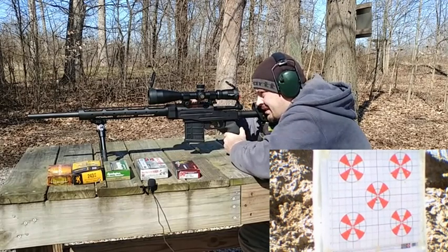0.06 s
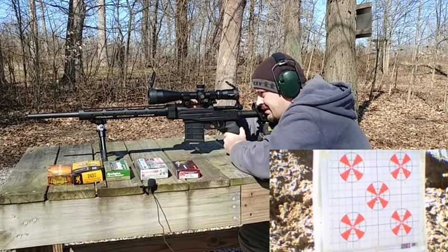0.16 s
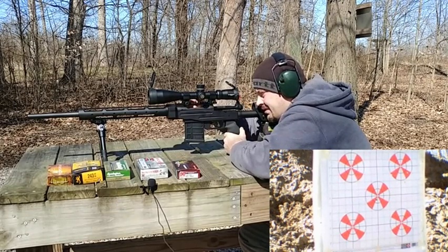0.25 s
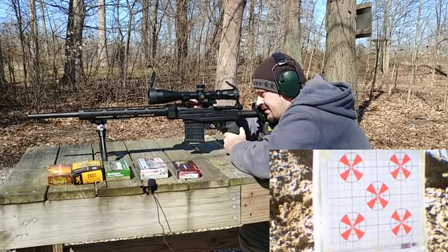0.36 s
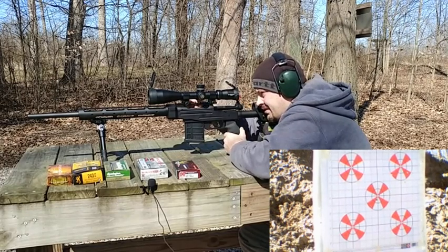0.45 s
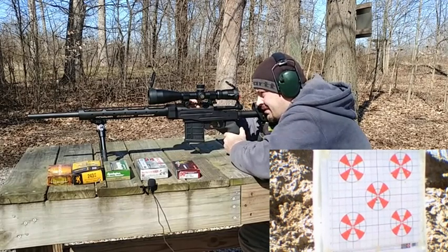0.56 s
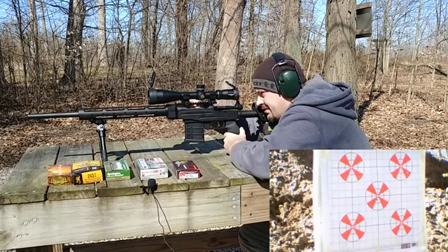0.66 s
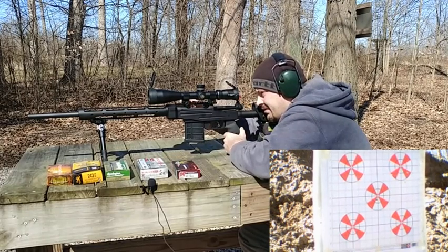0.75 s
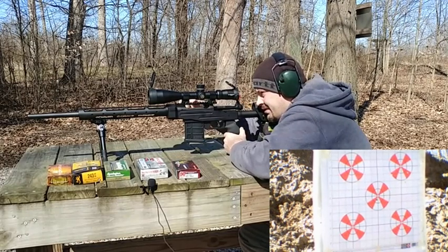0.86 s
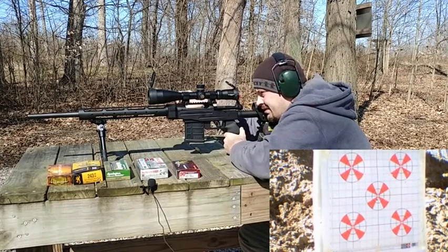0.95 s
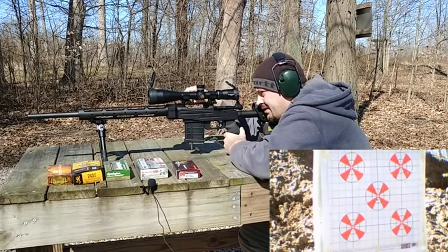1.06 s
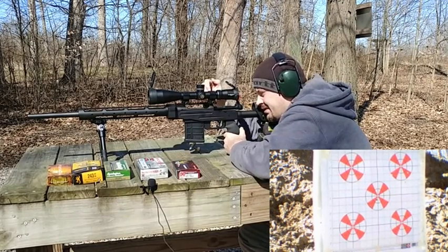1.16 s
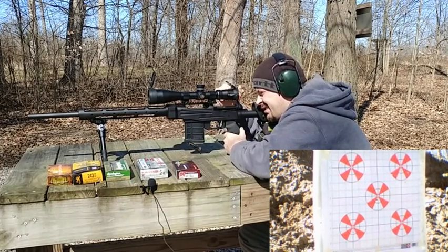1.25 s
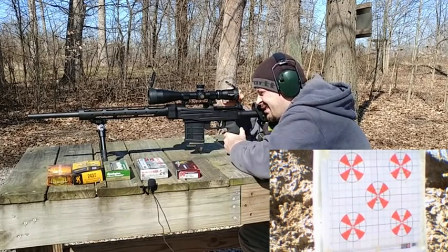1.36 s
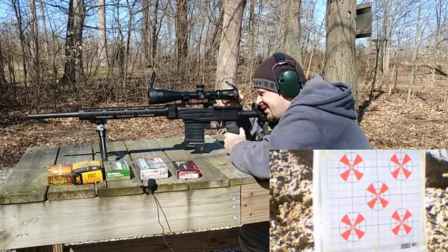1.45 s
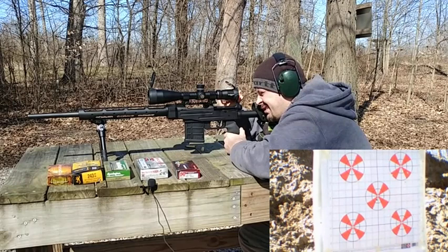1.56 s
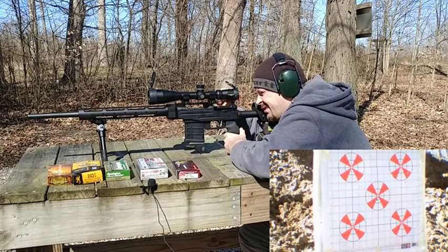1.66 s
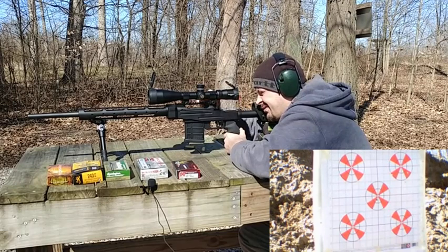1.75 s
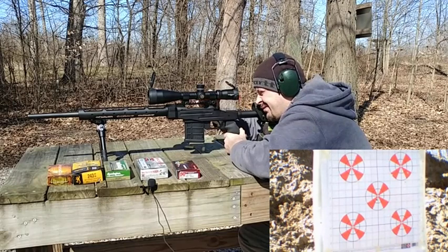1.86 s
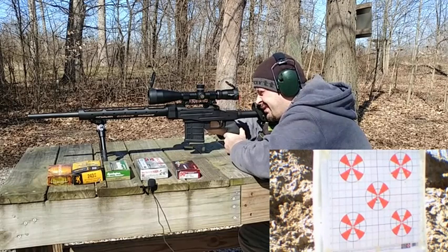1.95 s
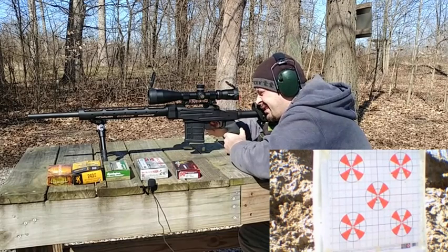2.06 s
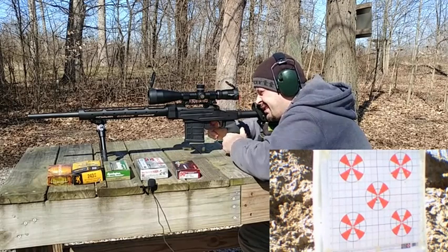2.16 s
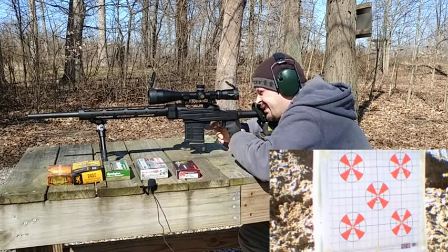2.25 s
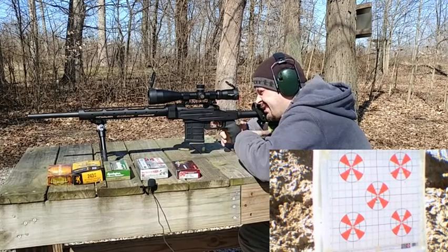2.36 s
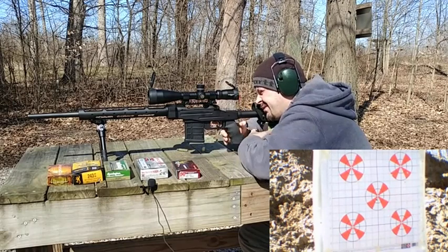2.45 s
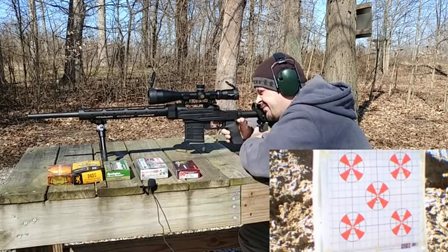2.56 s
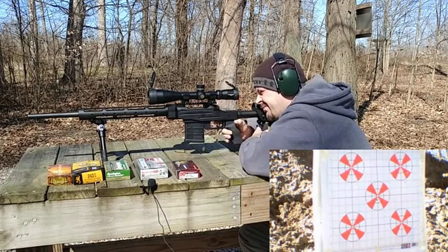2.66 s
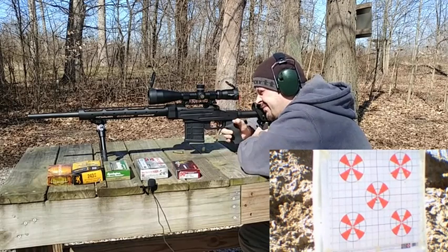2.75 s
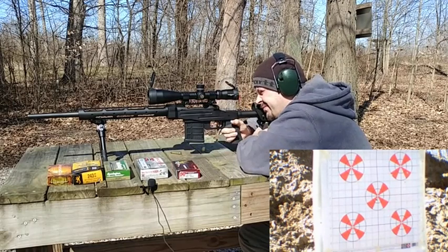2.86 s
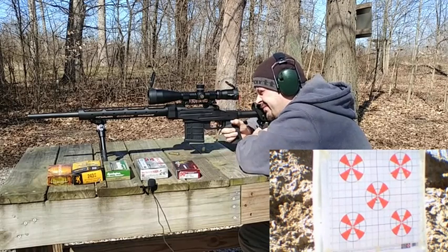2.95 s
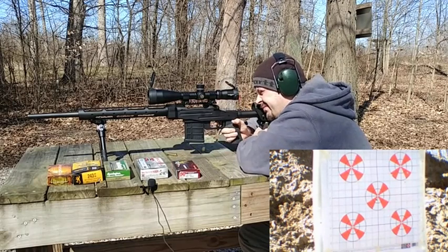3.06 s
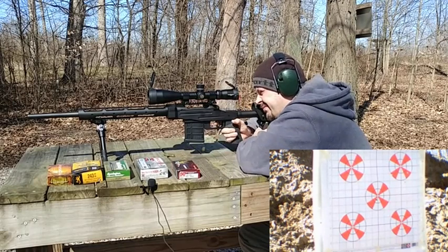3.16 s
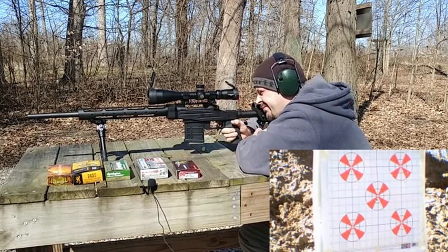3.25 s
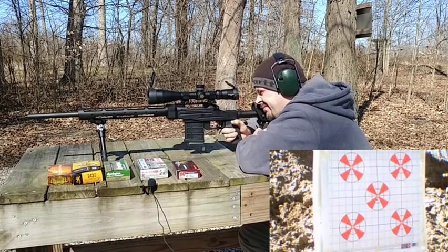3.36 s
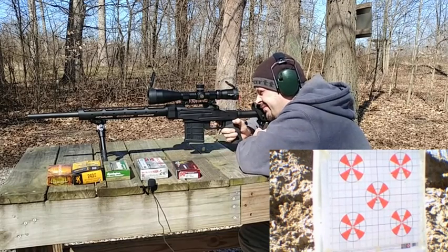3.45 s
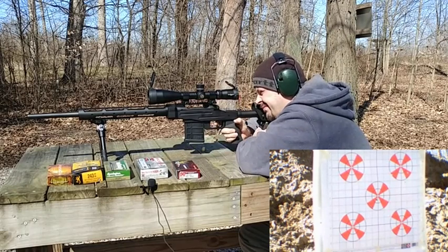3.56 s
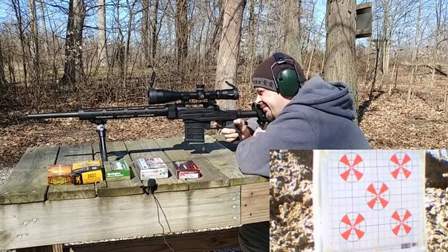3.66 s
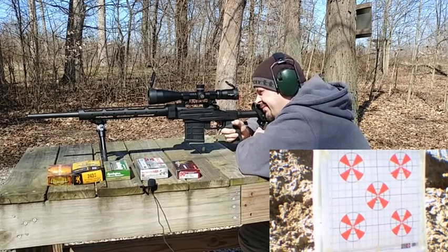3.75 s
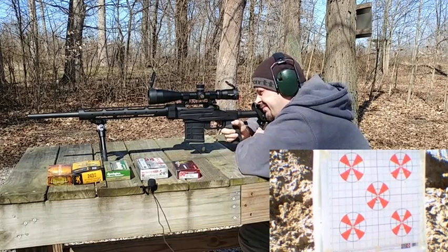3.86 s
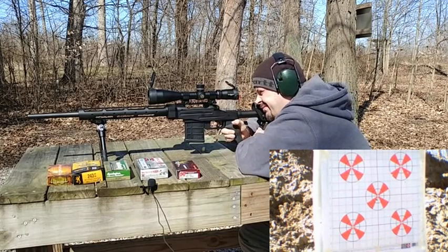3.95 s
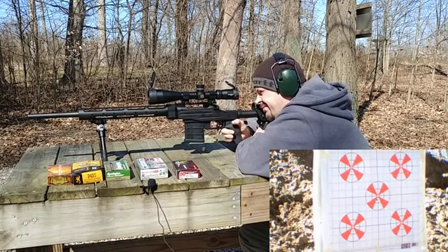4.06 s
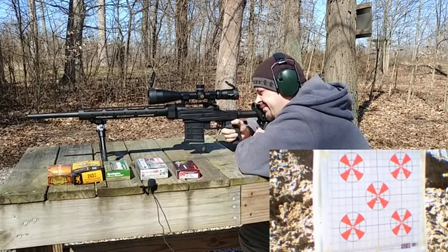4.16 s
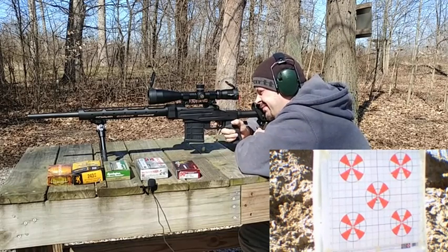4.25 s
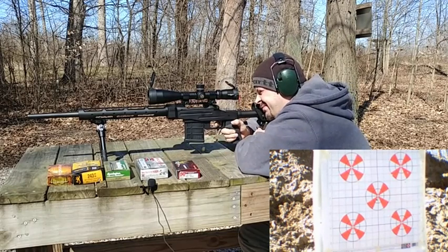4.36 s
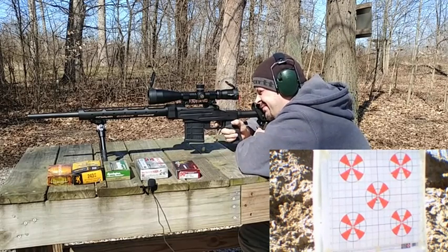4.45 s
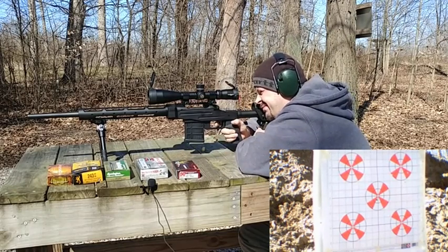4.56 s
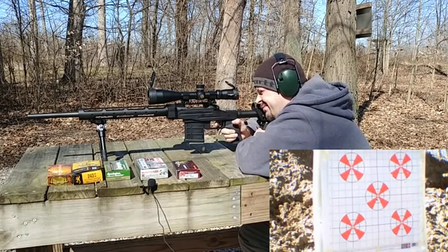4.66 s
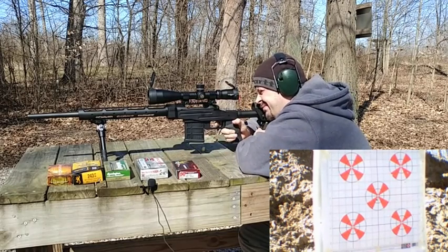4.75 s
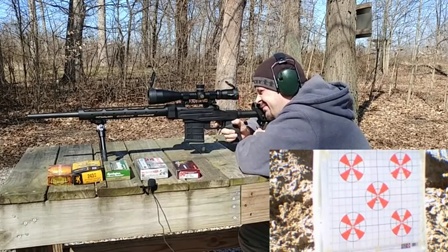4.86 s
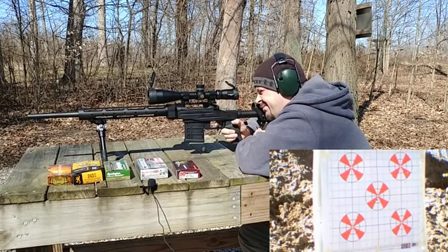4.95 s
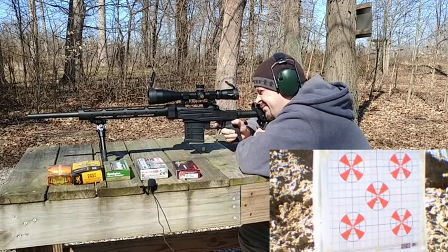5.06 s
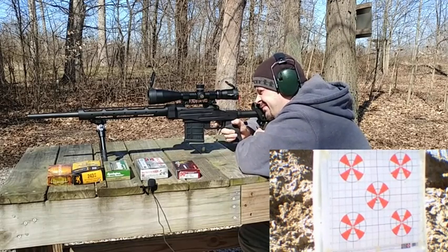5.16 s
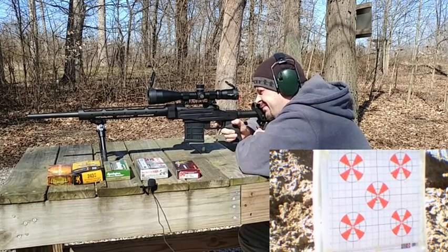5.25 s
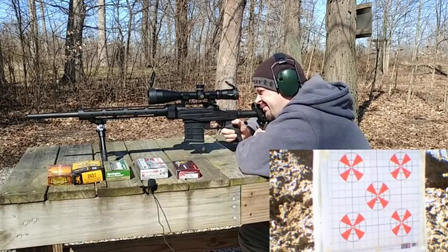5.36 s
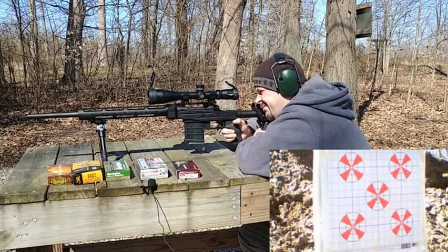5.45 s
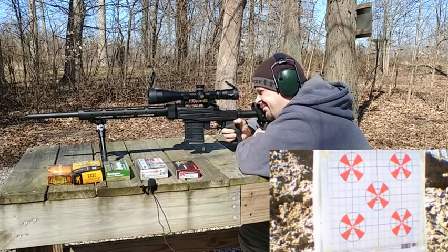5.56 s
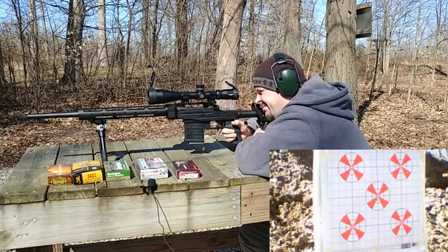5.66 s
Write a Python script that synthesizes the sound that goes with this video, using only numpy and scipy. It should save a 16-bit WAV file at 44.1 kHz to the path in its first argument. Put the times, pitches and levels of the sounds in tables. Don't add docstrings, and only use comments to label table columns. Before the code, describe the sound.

Close at a wooden bench in bare woods: small handle clicks, a crisp metal catch, then a hard brass-on-wood knock with rapid lighter bounces. A rough metal push ends in heavy clacks and a bright locking snap. The rest is quiet, with dull knocks and little ticks from shifting arms over a distant low engine rumble, a thin bird trill and steady microphone hiss. Echoes are faint and short.

```python
import sys
import numpy as np
from scipy import signal
from scipy.fft import rfft, irfft, next_fast_len
from scipy.io import wavfile
from scipy.ndimage import uniform_filter1d, map_coordinates

SR = 44100
rng = np.random.default_rng(int(sys.argv[2]) if len(sys.argv) > 2 else 0)


def bounce(signal):
    frames = np.transpose(np.atleast_2d(signal))
    limited = np.clip(frames, -1, 1)
    pcm = np.round(limited * 32767).astype(np.int16)
    wavfile.write(sys.argv[1], SR, pcm)


def ratio_of_db(decibels):
    return 10 ** (np.asarray(decibels, float) / 20)


N = 251722


def in_time(rows):
    s, *columns = np.transpose(rows)
    return [np.interp(np.arange(N) / SR, s, column) for column in columns]


def at_hz(points, hz):
    table_hz, values = np.array(points)[:, 0], np.array(points)[:, 1]
    return np.interp(np.log(hz + 1), np.log(table_hz), values)


def rms_one(x):
    return x / np.sqrt(np.mean(x ** 2) + 1e-20)


def coloured(x, points):
    size = next_fast_len(x.shape[-1], True)
    level_db = at_hz(points, np.fft.rfftfreq(size, 1 / SR))
    cepstrum = irfft(np.log(ratio_of_db(level_db)), size)
    cepstrum[1:size // 2] *= 2
    cepstrum[size // 2 + 1:] = 0
    return irfft(rfft(x, size) * np.exp(rfft(cepstrum)), size)[..., :x.shape[-1]]


def drift(rate_hz):
    steps = rng.standard_normal(600)
    return np.interp(np.arange(N) / SR * rate_hz, np.arange(600), steps)


def convolve(a, b):
    return signal.fftconvolve(a, b, axes=-1)[..., :a.shape[-1]]


# pitch_hz, level_db
APART = [(200, -12.5), (1000, -10), (3000, -9), (6000, 0.5)]


def spread(noise, points, apart=APART):
    mid, side = coloured(noise, points)
    return rms_one(mid + coloured(side, apart) * [[1], [-1]])


def plateau(s, held, level_db, rise_db_s, fall_db_s):
    t = np.arange(N) / SR
    return level_db - rise_db_s * np.maximum(s - t, 0) - fall_db_s * np.maximum(t - s - held, 0)


def evened(x):
    spectrum = rfft(x)
    power = uniform_filter1d(np.abs(spectrum) ** 2, size=48, axis=-1)
    return irfft(spectrum / np.sqrt(power), x.shape[-1])


def flutter(x, depth_db):
    waver = np.interp(np.arange(len(x)) / 256, np.arange(80), rng.standard_normal(80))
    return x * ratio_of_db(depth_db * waver)


def rings(modes, spread_db, stretch, size, split=0.):
    hz, level_db, t60 = np.transpose(modes)[:, :, None]
    hz = hz * (1 + split * rng.standard_normal(hz.shape))
    t = np.arange(size) / SR
    strength = ratio_of_db(level_db + spread_db * rng.standard_normal(hz.shape)) * rng.choice([-1, 1], hz.shape)
    decay = ratio_of_db(-60 * t / (t60 * stretch))
    return (strength * decay * np.sin(2 * np.pi * hz * t)).sum(axis=0)


def add(out, s, sound, pan_db):
    i = max(round(s * SR), 0)
    out[:, i:i + sound.shape[-1]] += sound[..., :N - i] * ratio_of_db([[pan_db / 2], [-pan_db / 2]])


BLOW_LEAD_S = .0065
STRIKE, RING_STRIKE = 3.9, 3.0


def blow(modes, crack, colour, contact_ms, ring_db, rattle_db, rattle_t60, stretch, size=6144):
    t = np.arange(size) / SR
    fade = np.hanning(2 * size)[size:]
    span = max(contact_ms, .2) / 1000
    force = np.minimum(t / 0.0013, 1) * np.exp(-(t / span) ** 2.0)
    uneven = ratio_of_db(2.5 * np.interp(t * 1500, np.arange(400), rng.standard_normal(400)))
    rattle = ratio_of_db(rattle_db - 60 * t / rattle_t60) * np.minimum(t / span, 1) * fade

    lead = np.zeros((2, 256))
    chatter = rng.standard_normal((2, size)) * uneven * (force + rattle)
    chatter[0, 16] += STRIKE
    dense = spread(evened(np.hstack([lead, chatter])), crack)

    drive = evened(force * rng.standard_normal(size))[:size // 8]
    drive[16] += RING_STRIKE
    ring = convolve(rings(modes, 2.0, stretch, size, split=.008), drive)
    ring = np.append(lead[0], ring * fade)

    dense, ring = coloured(dense, colour), coloured(ring, colour)
    sound = dense / np.abs(dense).max() + ratio_of_db(ring_db) * ring / np.abs(ring).max()
    sound[:, :256] = 0
    sound[:, -1024:] *= np.hanning(2048)[1024:] ** 2
    return sound / np.abs(sound.mean(axis=0)).max()


# time_s, fast_engine_db, slow_engine_db
DRONE = [(0, -5.5, -21.5), (1, -1.5, -8), (2, 0.5, -4.5), (2.7, -3.5, -13), (3, -12, -5), (3.6, -8.5, -3.5),
         (4.3, -7, -5), (4.9, -17.5, -3), (5.2, -3, -6), (5.71, -1, 0)]
FAST_HZ, SLOW_HZ = 29.71, 29
# multiple_of_rate, level_db
FAST_ORDERS = [(2, -65.5), (3, -62.5), (4, -72), (5, -79.5), (6, -60), (7, -75), (10, -71.5), (12, -87.5),
               (17, -81.5)]
# multiple_of_rate, level_db
SLOW_ORDERS = [(2, -54), (3, -64.5), (4, -64), (5, -62), (6, -71.5), (8, -81), (10, -73.5), (13, -77.5),
               (15, -81), (22, -80.5)]
# pitch_hz, level_db
RUMBLE = [(15, -39), (25, -15), (55, -2), (87, 2.5), (174, -7.5), (231, -12), (421, -21), (642, -20.5),
          (1820, -35.5), (3000, -36.5), (3900, -68.5), (6600, -120)]
# pitch_hz, level_db
FAR_APART = [(130, -14.5), (300, -4.5), (700, -2.5), (1500, 1)]
RUMBLE_DB, RUMBLE_RISE_DB, RUMBLE_RISE_S = -58.5, 2, 1.3
# start_s, length_s, pitch_hz, level_db
WHINE = [
    (2.68, 1, 645.5, -75),
    (2.95, .7, 790.3, -79),
]


def engine():
    fast_db, slow_db = in_time(DRONE)
    rumble_db = RUMBLE_DB - RUMBLE_RISE_DB * np.maximum(1 - np.arange(N) / SR / RUMBLE_RISE_S, 0)
    rumble = spread(rng.standard_normal((2, N)), RUMBLE, FAR_APART)
    out = ratio_of_db(rumble_db + 0.82 * drift(7.1)) * rumble
    for hz, orders, level_db in ((FAST_HZ, FAST_ORDERS, fast_db), (SLOW_HZ, SLOW_ORDERS, slow_db)):
        turn = 2 * np.pi * hz * np.cumsum(1 + .003 * drift(2.5)) / SR
        for k, db in orders:
            strength = np.sqrt(2) * ratio_of_db(db + level_db + 2.0 * drift(3.0))
            out = out + strength * np.sin(k * turn + 1.4 * drift(1.8))
    for s, held, hz, db in WHINE:
        strength = ratio_of_db(plateau(s, held, db, 120.0, 60.0) + 3.5 * drift(7.0))
        turn = 2 * np.pi * hz * np.cumsum(1 + .006 * drift(4.1)) / SR
        out = out + strength * np.sin(turn)
    out[1] = np.roll(out[1], 12)
    return out


# pitch_hz, level_db
HISS = [(590, -26), (1000, -4.5), (1120, -7.5), (1340, -7.5), (1610, -10.5), (2040, -7), (2320, -12.5),
        (2760, -8), (5320, -10), (8000, -8.5), (10700, -14.5), (15000, -15.5), (16300, -13.5)]


def hiss():
    return ratio_of_db(-72) * rms_one(coloured(rng.standard_normal((2, N)), HISS))


# pitch_hz, level_db
STEEL_CRACK = [(88, -50.5), (150, -20), (496, -11), (592, -14.5), (827, -3), (1320, -8.5), (1710, -6.5),
               (2040, -11), (2630, -1), (4470, -7.5), (7020, -14), (8050, -6.5), (10400, -17),
               (15100, -23.5), (16300, -31.5)]
# full_at_s, held_s, level_db, brightness_db
RUBS = [
    (0.001, 0.036, -55.5, -18),
    (.41, .003, -67.5, -23),
    (.585, 0.056, -64, -21),
    (0.839, 0.02008, -52, -11),
    (1.115, 0.094, -52.5, -12.5),
    (1.99, 0.11, -53.5, -5),
]
RUB_RISE_DB_S, RUB_FALL_DB_S = 750, 855.5
# time_s, level_db
PUSH = [
    (1.70, -81),
    (1.73, -56.5),
    (1.745, -42),
    (1.775, -38),
    (1.805, -25.5),
    (1.83, -30),
    (1.855, -28.5),
    (1.885, -46),
    (1.93, -75),
]
PUSH_BRIGHT_DB, BRIGHT_PER_DB = -2, 2
# start_s, level_db, fall_db_per_s, brightness_db
SETTLE = (2, -47.5, 130, -10)


def slides():
    happens = rng.random((2, N)) < 6000 / SR
    size = ratio_of_db(1.8 * np.minimum(rng.exponential(1, N), 4))
    clicks = happens * size * rng.choice([-1, 1], (2, N))
    grit = spread(clicks, STEEL_CRACK) * ratio_of_db(2.2 * drift(67.0))
    low, high = [rms_one(signal.sosfilt(signal.butter(2, 6000, kind, fs=SR, output="sos"), grit))
                 for kind in ("low", "high")]

    before, after = (PUSH[0][0] - .004, -110), (PUSH[-1][0] + .01, -110)
    push_db, = in_time([before] + list(PUSH) + [after])
    strokes = [(push_db, PUSH_BRIGHT_DB + BRIGHT_PER_DB * (push_db + 26.5))]
    for s, held, db, bright_db in RUBS:
        strokes.append((plateau(s, held, db, RUB_RISE_DB_S, RUB_FALL_DB_S), bright_db))
    settle_s, settle_db, fall_db_s, settle_bright_db = SETTLE
    strokes.append((plateau(settle_s, 0, settle_db, 4000, fall_db_s), settle_bright_db))

    out = sum(ratio_of_db(level_db) * (low - ratio_of_db(high_db) * high) for level_db, high_db in strokes)
    return out * ratio_of_db([[-1.5], [1.5]])


# start_s, peak_db, hardness_db, brass_ring_db, lowest_brass_mode_db
BOUNCES = [(0.009, -34, 28, -54, 10), (1.0955, -5.5, 11, -35, -3), (1.1015, -11, 12, -61, 3),
           (1.173, -25.5, 2, -34.5, -9), (1.204, -43, 2, -55, -4), (1.244, -39.5, -6.5, -71, 3),
           (1.279, -35.5, -4.5, -90, 1), (1.285, -11.5, 3.5, -65, 14), (1.2906, -22, -3, -79, 3),
           (1.307, -31, 0.5, -65, 3), (1.342, -24.5, -27, -82, 4), (1.37, -33, -24.5, -80, 4),
           (1.39, -45, -6.5, -99, 2), (1.428, -20.5, -8, -56, 10), (1.486, -22.5, -4, -68, 9),
           (1.531, -36.5, -8, -82, 3), (1.547, -41, -25.5, -90, 3)]
# pitch_hz, level_db, fade_by_60_db_s
PLANK = [(364, -10, 0.11), (450, -10, 0.028), (534, -10, .06), (857, -3, 0.047), (936, -4.5, .045),
         (982.8, -4.5, .065), (1184, -4, 0.085), (1378, -7.5, 0.074), (1530, -7.5, .03),
         (1800, -2.5, 0.057), (2217, -8.5, 0.059), (2700, -17, 0.052), (2910, -15.5, 0.059),
         (3198, -17, 0.025)]
# pitch_hz, level_db
PLANK_CRACK = [(47, -41), (80, -22), (380, -4.5), (708, -7.5), (946, -1.5), (1610, -5.5), (1800, -9.5),
               (1970, -5.5), (7010, -35.5), (9570, -27.5), (12000, -82), (14600, -31.5), (16300, -64)]
# pitch_hz, level_db, share_of_ring_time
BRASS = [(9890, -6, 1.3), (14090, 0, 1.2), (14720, -2, .8), (14830, -12, .6)]
BRASS_T60_S, CASE_PAN_DB = .16, 0.84
DEPTH_PER_DB, HARD_SHARE = 0.04, 0.65


def case():
    out = np.zeros((2, N))
    swell = np.minimum(np.arange(16384) / SR / .003, 1)
    for s, db, hard_db, brass_db, low_db in BOUNCES:
        colour = [(250, -1.5), (400, DEPTH_PER_DB * (db + 12.0)), (800, -1.5), (1800, -0.5),
                  (3000, HARD_SHARE * hard_db), (4200, hard_db + 3.0), (5500, 2 * hard_db - 10.0)]
        knock = blow(PLANK, PLANK_CRACK, colour, 7.0, 4.0, -7.5, 0.14, stretch=0.84)
        add(out, s - BLOW_LEAD_S, ratio_of_db(db) * knock, CASE_PAN_DB)
        ring = coloured(rings(BRASS, 3.0, BRASS_T60_S, size=16384), [(11000, low_db), (13000, 0)])
        add(out, s, ratio_of_db(brass_db) * swell * ring, CASE_PAN_DB)
    return out


# pitch_hz, level_db, fade_by_60_db_s
STEEL = [(361, -6, .09), (980, -4, .12), (1136, -12, .2), (2606, -14, .3), (2920, -16, .3),
         (3140, -14, .25), (4797, -12, .2), (4931, -9, .22), (5033, -10, .25), (5103, -6, .15),
         (5879, -9, .16), (6611, -16, .3), (8156, -13, .13), (9152, -18, .2)]
# start_s, peak_db, brightness_db, contact_ms
DRAW_HITS = [
    (0.021, -40.5, 1, 3.1),
    (0.029, -38, -19, 1.1),
    (0.395, -52, -11, 9.1),
    (0.619, -43, 5.5, 1.9),
    (0.818, -43, 3, 4.0),
    (0.833, -26.5, 3, 3.5),
]
# pitch_hz, level_db
DRAW_CRACK = [(150, -25), (700, -1), (1400, -9), (3200, 0.5), (5500, -22), (8200, -8.5), (9500, -18),
              (13700, -40.5), (16300, -57.5)]
# start_s, peak_db, brightness_db, contact_ms
CATCH = [
    (0.012, -40, -15, 5.6),
    (0.866, -17, 2.5, 1.4),
]
# pitch_hz, level_db
CATCH_CRACK = [(180, -53.5), (300, -24), (566, -30.5), (935, -24.5), (2310, -31.5), (3280, -10.5),
               (3870, -12), (4820, 3.5), (6960, -28.5), (7560, -15.5), (8940, -11.5), (10600, -42.5),
               (16300, -57)]
# pitch_hz, level_db, fade_by_60_db_s
CLICK = [(3600, -24, .014), (4880, -13, .014), (5890, -38, 0.11), (8000, -18, .012), (9010, -16, .012)]
# start_s, peak_db, brightness_db, contact_ms
STEEL_HITS = [(1.735, -20.5, 5, 3.9), (1.7838, -19.5, -3.5, 6), (1.7917, -12.5, -4.5, 7.9),
              (1.7965, -16, -3.5, 4.8), (1.8006, -6, 2, 5.5), (1.805, -11, 0.9, 5.5), (1.809, -8.5, 3, 3.0),
              (1.8135, -14, 0.4, 3.3), (1.819, -17, -5, 6.5), (1.8355, -16, -7, 2.2), (1.845, -14, -4, 5.7),
              (1.8488, -3.5, 0.05, 2.7), (1.852, -12, -0.5, 2.5), (1.98, -28.5, -3, 3.3),
              (1.985, -22, 4.5, 5.9)]
# pitch_hz, level_db, fade_by_60_db_s
CAM = [(2728, -52, .3), (3266, -53.5, 0.452), (3500, -52.5, 0.53), (3700, -53, 0.3493), (5880, -50.5, 0.29),
       (8550, -50.5, 0.31)]
# start_s, peak_db, brightness_db, contact_ms
SNAPS = [
    (2.0725, -23, 2, 3.3),
    (2.0756, -5, 1, 1.75),
    (2.079, -16, -3.5, 2.1),
    (2.083, -16, -9.5, 2.3),
]
# pitch_hz, level_db
SNAP_CRACK = [(88, -40), (150, -9), (570, -21), (930, 2), (1270, -10), (1610, -3.5), (2080, -14.5),
              (2740, -20), (4470, -10), (5130, -4.5), (5550, -7), (6880, -25), (8210, -12), (9900, -21),
              (14500, -36), (16300, -59)]
# pitch_hz, level_db, fade_by_60_db_s
LOCK = [(385, -28.5, 0.091), (946, -14, .04), (1605, -16.5, 0.032), (2728, -12, 0.022),
        (3238, -15.5, 0.026), (4280, -20.5, .03), (5115, -2, 0.019)]
# pitch_hz, level_db, fade_by_60_db_s
BARREL = [(536, -63.5, 0.61), (790, -62.5, 0.95), (1100.3, -61, 1), (1180, -60, 0.7), (2550, -56, 0.598),
          (2720, -58, .55), (5000, -53.5, 0.44), (5210, -56.5, 0.43)]
# pitch_hz, level_db, fade_by_60_db_s
HUM = [(5879, -35, .17), (5103, -35, .18), (4931, -42, .27), (1136, -43.5, 0.24), (8156, -40.5, .14),
       (3100, -46.5, .28), (6551, -50, .3)]
CAM_S, LOCK_RISE_S = 1.986, 0.000797
BODY_LOSS = 0.19


def steel():
    out = np.zeros((2, N))
    # hits, crack, ring dB, rattle dB, body dB, pan dB, stretch of the ring time
    groups = ((DRAW_HITS, DRAW_CRACK, -28, -17, 1.5, -1.5, .91),
              (CATCH, CATCH_CRACK, -36, -19, -8, -5, .55),
              (STEEL_HITS, STEEL_CRACK, -28, -17, -0.5, -2.5, .91),
              (SNAPS, SNAP_CRACK, -24, -22, -1.5, -2.5, .91))
    for hits, crack, ring_db, rattle_db, body_db, pan_db, stretch in groups:
        for s, db, bright_db, ms in hits:
            colour = [(1500, body_db - BODY_LOSS * bright_db), (2500, 0.0022), (5500, 0), (7000, bright_db)]
            hit = blow(STEEL * 2, crack, colour, ms, ring_db, rattle_db, 0.078, stretch)
            add(out, s - BLOW_LEAD_S, ratio_of_db(db) * hit, pan_db)

    catch_s, lock_s = CATCH[1][0], SNAPS[1][0]
    rise = np.minimum(np.arange(16384) / SR / LOCK_RISE_S, 1)
    quick_rise = np.minimum(3.2 * rise, 1)
    add(out, catch_s - .0003, quick_rise * rings(CLICK, 0, 0.8, size=16384), -5.0)
    add(out, lock_s - .0004, rise * rings(LOCK, 0, 0.85, size=16384), -2.5)
    add(out, lock_s, rings(BARREL, 0, 1, size=30000), 0)
    for s, modes in ((CAM_S, CAM), (lock_s, HUM)):
        for mode in modes:
            add(out, s, flutter(rise * rings([mode], 0, 1, size=16384), 5), -2.5)
    return out


# pitch_hz, fade_by_60_db_s
WOOD_T60 = [(200, 1), (1000, 0.32), (2800, 0.39), (5000, 0.25), (12000, 0.4)]
# pitch_hz, level_db
ECHO_COLOUR = [(100, 0), (1500, 0.3), (3000, -3.5), (4000, -0.5), (5100, -2.5), (6500, -0.5), (8200, -3),
               (11000, -0.5)]


def woods(x):
    size = 30000
    edges = 100 * 2 ** np.arange(0, 7.6, .5)
    t = np.arange(size) / SR
    white = rng.standard_normal((2, 2, size))
    tail = 0
    for k, (low, high) in enumerate(zip(edges, edges[1:])):
        band_pass = signal.butter(2, [low, high], "band", fs=SR, output="sos")
        band = signal.sosfilt(band_pass, white[k % 2])
        tail = tail + band * ratio_of_db(-60 * t / at_hz(WOOD_T60, np.sqrt(low * high)))
    tail = spread(tail * np.minimum(t / 0.0072, 1), ECHO_COLOUR)
    return convolve(x.mean(axis=0)[None], tail / np.sqrt(size))


# start_s, peak_db, edge_db, depth_db
KNOCKS = [(2.964, -59, -27, -8), (3.049, -65, -9, -13), (3.329, -56.5, -8, 1), (3.478, -53, -0.5, 5),
          (3.658, -58, -15, 7), (3.814, -56.5, -18, -7), (3.866, -45, -24, -8), (3.932, -55, -22, 12),
          (3.991, -63, -6, 6), (4.202, -51, -11, 24), (4.236, -43.5, -1, 9), (4.333, -51, -21, 11),
          (4.348, -46.5, -27, 5), (4.481, -53.5, -2, 23), (4.766, -38, 2, 6), (4.796, -45, -7, 6.5),
          (4.817, -54, -11, 17)]
# pitch_hz, level_db, fade_by_60_db_s
FRAME = [(430, 0, .09), (700, -6, .05), (790, -5, .05), (1020, -3, .045), (1330, -3, .05), (1760, -6, .04),
         (2250, -11, .03), (2580, -12, .03), (3000, -16, .03)]
# pitch_hz, level_db
KNOCK_CRACK = [(150, -69), (250, -6.5), (437, 7.5), (555, 10.5), (1010, 13), (1570, 3), (1790, -3),
               (2040, -7), (2530, -27), (6000, -53), (7800, -83), (13200, -120)]
KNOCK_MS, KNOCK_PAN_DB = 11.5, 0.5
# start_s, level_db
TICKS = [
    (3.817, -59),
    (3.869, -52),
    (3.9175, -64),
    (3.933, -73),
    (3.957, -73),
    (3.993, -67),
    (4.05, -70.5),
]
TICK_HZ, TICK_T60_S = 1294, .09
# start_s, level_db, pitch_hz, fade_by_60_db_s
THUMPS = [
    (1.098, -34, 103.7, 0.43),
    (1.288, -41.5, 92.4, 0.23),
    (1.49, -38, 70, 0.21),
    (1.752, -36.5, 189.3, 0.19),
    (1.851, -36, 200, 0.12),
    (2.08, -28, 175, 0.08),
    (4.344, -45, 240, 0.043),
]


def bench():
    out = np.zeros((2, N))
    for s, db, edge_db, depth_db in KNOCKS:
        colour = [(450, depth_db), (700, 0), (1400, 0), (2000, edge_db)]
        knock = blow(FRAME, KNOCK_CRACK, colour, KNOCK_MS, 0.2, -3.5, 0.2, stretch=1)
        add(out, s - BLOW_LEAD_S, ratio_of_db(db) * knock, KNOCK_PAN_DB)
    for s, db in TICKS:
        add(out, s, rings([(TICK_HZ, db, TICK_T60_S)], 0, 1, size=8192, split=.01), KNOCK_PAN_DB)
    for s, db, hz, t60 in THUMPS:
        add(out, s, rings([(hz, db, t60), (1.5 * hz, db - 7.5, t60)], 0, 1, size=16384), 0)
    return out


# start_s, length_s, start_pitch_hz, level_db
TRILLS = [
    (2.255, 0.21, 2843, -70.5),
    (3.915, 0.29, 2940, -74.5),
]
TRILL_RISE_HZ_S, TRILL_EDGE_DB_S = 900, 450
NOTES_PER_S, NOTE_FALL_HZ = 25.7, 377


def bird():
    out, t = 0, np.arange(N) / SR
    narrow = signal.butter(2, 150, fs=SR, output="sos")
    scratch = .9 + .35 * rms_one(signal.sosfilt(narrow, rng.standard_normal(N)))
    for s, held, start_hz, db in TRILLS:
        beat = (NOTES_PER_S * (t - s) + .25) % 1
        note = .3 + np.exp(-((beat - .5) / .22) ** 2)
        rise_hz = TRILL_RISE_HZ_S * np.clip(t - s, -.1, held + .1)
        hz = start_hz + rise_hz - NOTE_FALL_HZ * (beat - .5)
        level = ratio_of_db(plateau(s, held, db, TRILL_EDGE_DB_S, 240.0))
        out = out + note * level * np.sin(2 * np.pi * np.cumsum(hz) / SR)
    return out * scratch


# pitch_hz, level_db
CLOSE_COLOUR = [(10050, 0), (10500, -11.5), (10900, -12), (11700, -4), (12600, 0)]
LEFT_LAG_S = -0.00004


def scene():
    far = engine() + hiss()
    close = coloured(slides() + case() + steel() + bench(), CLOSE_COLOUR)
    close[0] = map_coordinates(close[0], [np.arange(N) - LEFT_LAG_S * SR], order=3)
    return far + close + ratio_of_db(-19.5) * woods(close) + bird()


def roll_off(x):
    return signal.sosfilt(signal.butter(12, 16470, fs=SR, output="sos"), x)


def record(dry):
    bass_cut = signal.butter(2, 45, "high", fs=SR, output="sos")
    top_cut = signal.cheby2(16, 60, 16500, fs=SR, output="sos")
    clipped = np.clip(signal.sosfilt(bass_cut, dry), -.95, .95)
    mix = signal.sosfilt(top_cut, clipped)
    return roll_off(mix)


dry = scene()
out = record(dry)
bounce(out)
```